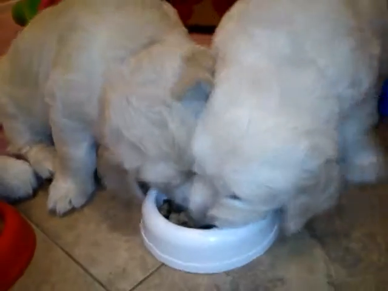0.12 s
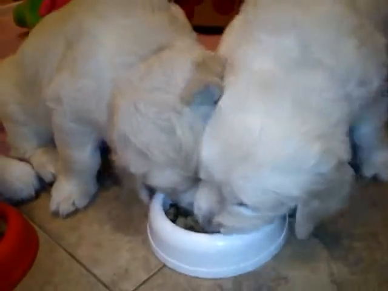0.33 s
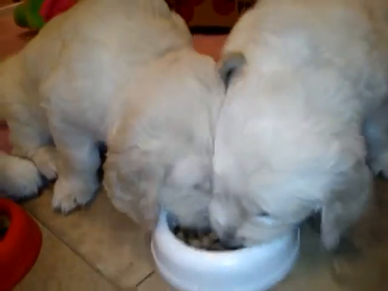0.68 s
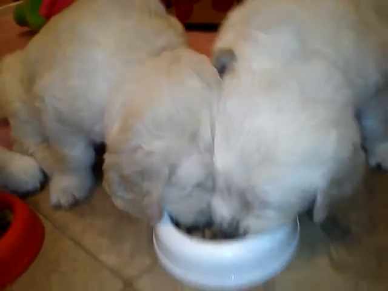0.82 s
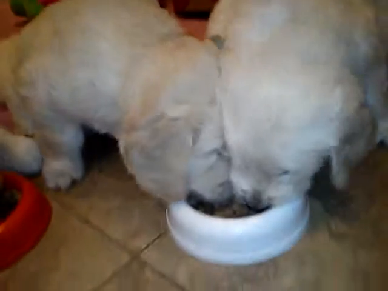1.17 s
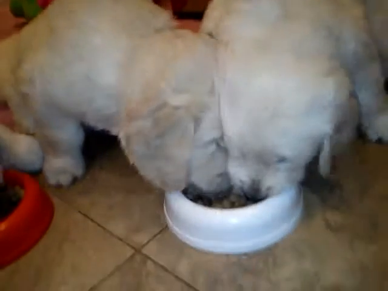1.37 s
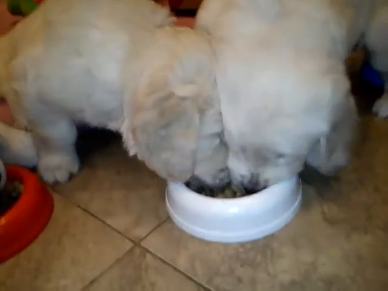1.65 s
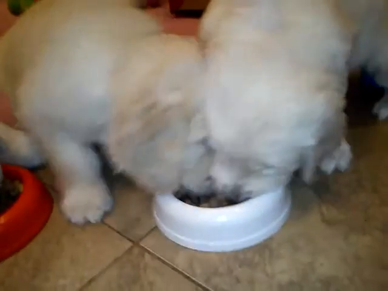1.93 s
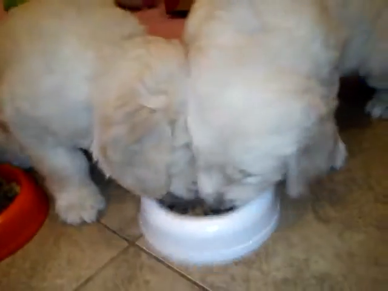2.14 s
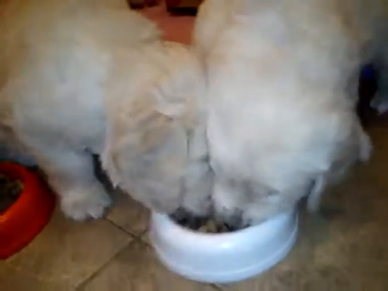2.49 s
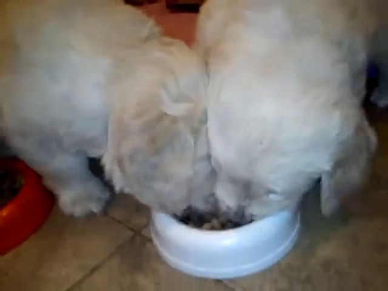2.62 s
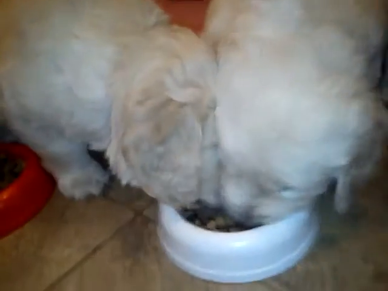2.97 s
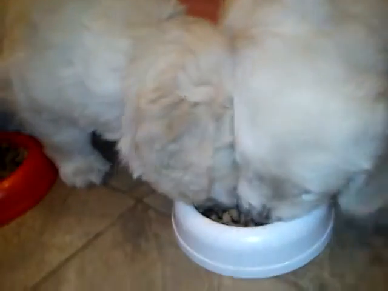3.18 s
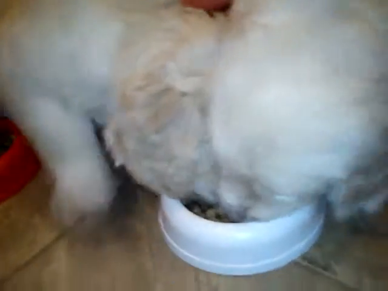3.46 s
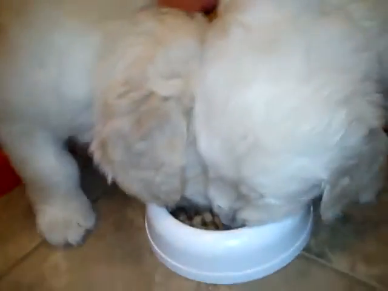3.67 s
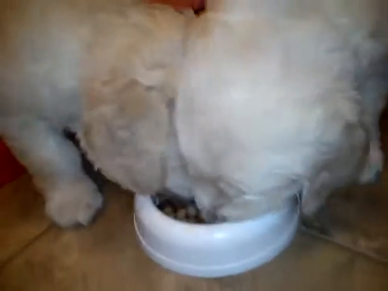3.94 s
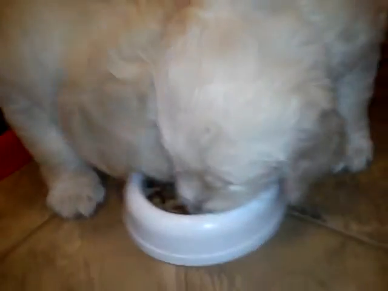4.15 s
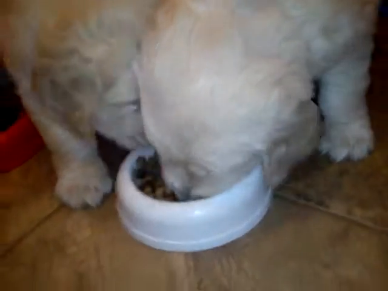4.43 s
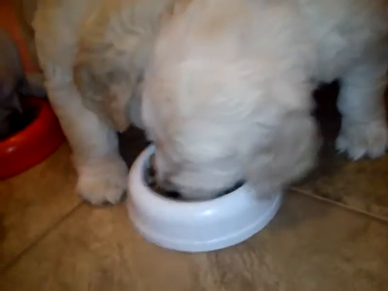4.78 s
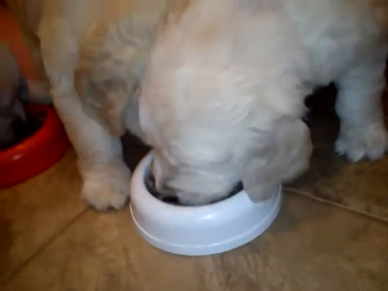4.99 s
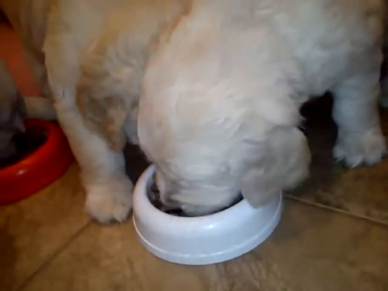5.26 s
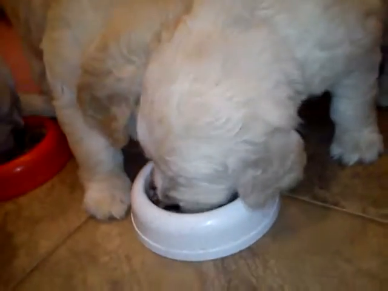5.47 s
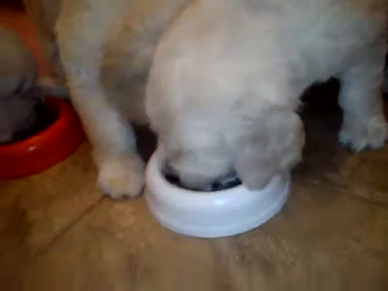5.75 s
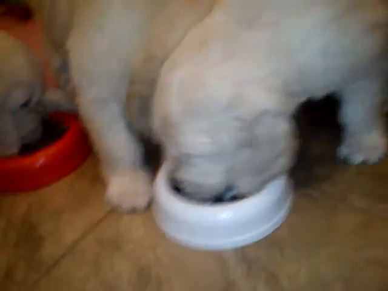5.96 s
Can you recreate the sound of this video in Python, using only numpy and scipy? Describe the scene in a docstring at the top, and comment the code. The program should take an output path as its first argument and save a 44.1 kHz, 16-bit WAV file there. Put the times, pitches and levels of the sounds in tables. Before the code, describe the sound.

Close mono sound of two puppies eating dry kibble from a plastic bowl on a hard floor, in a quiet room with short, slight reverberation. From the start, muzzle shoves make irregular bursts of dense pellet clatter, several per second, with crisp ticks, a hollow plastic colour and dull closed-mouth munching. A small pellet snaps at 0.15 s; bowl knocks begin around 0.55 s and recur unevenly. More snaps come at 1.2 to 1.6 s, and soft low paw thumps from 1.9 s. At 2.75 s a strong knock coincides with bright cracks. Rummaging grows fuller and loudest from 3.4 to 4 s, with several knocks; another hard, sharp one lands at 4.2 s. Afterwards the clatter thins and softens, with a duller knock at 5.2 s. From 5.3 s fur hisses faintly on the rim while light crunching continues to the end at about 6.1 s.

```python
"""Two puppies root for dry kibble in a plastic bowl on a hard floor, close to a mono microphone.
From the start, muzzle shoves set off dense random clicks, filtered and rung by bowl modes; dull clicks munch.
Pellets snap from 0.15 s (noise bursts); the bowl is knocked from 0.55 s (short pulses through filters).
Paws thump softly from 1.9 s (low noise pulses); fur, a very faint hiss until then, brushes the rim from 5.3 s.
Shaped noise gives the quiet of the room throughout."""
import sys
import numpy as np
from scipy import signal
from scipy.fft import rfft, irfft
from scipy.io import wavfile
from scipy.ndimage import uniform_filter1d

SR = 44100
rng = np.random.default_rng(int(sys.argv[2]) if len(sys.argv) > 2 else 0)


def dump(signal):
    """Clip the signal to [-1, 1] and save it as 16-bit WAV at the path in sys.argv[1]."""
    limited = np.clip(np.atleast_2d(signal).T, -1, 1)
    pcm = np.round(limited * 32767).astype(np.int16)
    wavfile.write(sys.argv[1], SR, pcm)


N = 269892
TIME_S = np.arange(N) / SR

# Muzzle shoves: (time [s], clatter rise [s], length [s], relative clatter level [dB],
# crispness: treble re clatter [dB], relative munching level [dB])
MUZZLE_SHOVES = [ (0.0, 0.0013, 0.049, -58, -8, -59.5), (0.047, 0.04, 0.13, -48, -6.5, -62),
                 (0.173, 0.026, 0.06, -45, -8.5, -60.5), (0.307, 0.013, 0.017, -52.5, -12.5, -59.5),
                 (0.357, 0.016, 0.044, -46.5, -8.5, -58.5), (0.403, 0.055, 0.17, -41.5, -7.5, -61),
                 (0.588, 0.016, 0.071, -45, -8, -72), (0.731, 0.073, 0.088, -50, -11, -65.5),
                 (0.904, 0.0049, 0.013, -52.5, -9.5, -72), (0.923, 0.082, 0.11, -42, -9, -63.5),
                 (1.031, 0.009, .03, -51, -2.5, -61), (1.108, 0.027, 0.048, -55, -8, -68),
                 (1.195, 0.038, 0.14, -49.5, -10.5, -61.5), (1.362, 0.018, 0.061, -49.5, -11, -64.5),
                 (1.487, .008, 0.012, -68, -17, -80), (1.626, 0.042, 0.078, -49.5, -9, -70),
                 (1.75, 0.049, 0.088, -43.5, -7, -65), (1.853, .025, .065, -50.5, -12, -64),
                 (1.963, 0.059, 0.13, -45, -10, -68.5), (2.06, 0.048, 0.19, -42.5, -7.5, -68),
                 (2.266, 0.039, 0.14, -47.5, -9, -65), (2.369, .07, .125, -45, -8.5, -75),
                 (2.522, 0.014, 0.03, -49.5, -10.5, -72), (2.622, 0.024, 0.06, -49.5, -10.5, -60),
                 (2.738, 0.0071, 0.082, -42.5, -4, -59), (2.837, 0.05, 0.15, -45, -5.5, -66),
                 (2.98, 0.02, 0.11, -42, -8.5, -60), (3.095, 0.054, 0.17, -43, -8, -62.5),
                 (3.245, 0.0082, 0.034, -46, -7.5, -60), (3.326, 0.043, 0.1, -48, -11.5, -60.5),
                 (3.441, .075, 0.15, -40.5, -8.5, -61.5), (3.591, 0.03, 0.057, -37, -10, -57),
                 (3.675, 0.011, 0.031, -49, -18, -56.5), (3.753, 0.011, 0.05, -40.5, -12, -58),
                 (3.793, 0.03, 0.13, -40.5, -8, -60), (3.978, .012, 0.032, -48.5, -11, -58),
                 (4.1, 0.025, 0.097, -42, -11.5, -66), (4.167, 0.034, 0.097, -43, -9.5, -63),
                 (4.326, 0.021, 0.074, -53.5, -10, -60.5), (4.466, 0.048, 0.09, -48, -12, -66.5),
                 (4.569, 0.012, 0.029, -51, -12.5, -79), (4.698, 0.029, 0.045, -50.5, -9, -60),
                 (4.744, 0.036, 0.064, -50, -9.5, -66), (4.853, .012, .028, -66, -20, -67),
                 (4.928, 0.019, 0.058, -56, -9, -65.5), (5.045, 0.027, 0.039, -54, -9.5, -63.5),
                 (5.206, 0.012, 0.034, -52.5, -9, -59.5), (5.33, .015, 0.018, -61.5, -4, -74),
                 (5.383, 0.011, 0.023, -61.5, -4, -70.5), (5.453, 0.023, 0.058, -60.5, -7, -83),
                 (5.508, 0.024, 0.042, -54, -10.5, -66), (5.702, 0.04, 0.12, -59.5, -5, -65),
                 (5.897, 0.039, 0.069, -54.5, -9, -65.5), (5.951, 0.02, 0.032, -52, -10, -58.5),
                 (6.008, 0.023, 0.085, -55.5, -7, -61.5), ]
# Muzzle depth, which brings out the bowl's hollow: (time [s], hollow re clatter [dB])
DIG_DEPTH = [(0, -2.5), (.5, -7), (1.3, 1.5), (1.7, -2.5), (2.15, -1.5), (2.5, -5), (2.75, -1.5), (2.9, -9),
             (3.15, -7), (3.35, -1), (3.65, -1), (3.9, -6), (4.2, -3), (4.55, -1.5), (4.8, -0.5), (6.1, 0)]
# Chewed crumbs grind finer than whole pellets: (time [s], lift of the top treble [dB])
CRUMB_FINENESS = [(0, 4), (.5, 2), (1, -0.5), (1.5, -1.5), (2.2, -3), (2.75, -2.5), (3.2, 1.5),
                  (3.45, -5.5), (4.2, -5.5), (4.7, -1.5), (6.1, -15)]
# Knocks on the bowl: (time [s], relative level [dB], contact time [ms])
BOWL_KNOCKS = [(.551, -46, 0.15), (.602, -35, 0.17), (.984, -36, 0.24), (1.239, -38, 0.22),
               (1.793, -44, 0.48), (2.134, -36.5, 0.95), (2.653, -36, 0.6), (2.7431, -27, 0.42),
               (3.469, -34, 0.49), (3.622, -33, 0.15), (3.762, -35, 0.41), (3.993, -51, 0.44),
               (4.104, -34, 0.17), (4.2043, -27, 0.13), (4.358, -37, 0.39), (4.522, -38.5, 0.15),
               (4.616, -41, 0.36), (5.236, -39, 0.71)]
# Pellets snapping between teeth: (time [s], relative level [dB])
TOOTH_SNAPS = [(0.146, -53), (.752, -56), (1.163, -59), (1.24, -50.5), (1.407, -49.5), (1.498, -60),
               (1.6155, -59.5), (2.751, -42.5), (2.785, -50), (4.434, -62), (4.618, -58), (5.047, -69),
               (5.77, -71), (5.963, -57)]
# Ringing of the bowl: (frequency [Hz], width [Hz], gain re direct sound [dB])
BOWL_MODES = [(695, 52, -11), (769, 26, -4.5), (2169, 83, 5), (3054, 120, 6), (4080, 94, -11),
              (6050, 59, -11), (7040, 21, 4), (7890, 380, -1)]
# Fur on the rim: (time [s], relative level [dB])
FUR_BRUSH = [(5.3, -75), (5.38, -62.5), (5.55, -67), (5.62, -69), (5.72, -63.5), (6.12, -65.5)]
# Paw steps and shifts of weight: (time [s], relative level [dB])
PAW_STEPS = [(1.94, -69), (2.744, -67), (3.179, -61.5), (3.258, -64), (4.439, -71), (4.561, -71),
             (5.845, -67)]
# Spectrum of pellet clatter: (frequency [Hz], relative density [dB])
CLATTER_SPECTRUM = [(120, -43), (400, -22.5), (700, -12), (1080, -13), (1300, 2.5), (1450, -3), (1640, 1),
                    (1900, -1.5), (2080, -10.5), (2260, -7), (2380, -13), (2750, -18.5), (3800, -59)]
# Spectrum of the bowl's hollow: (frequency [Hz], relative density [dB])
HOLLOW_SPECTRUM = [(80, -48), (250, -38.5), (500, -12.5), (660, 2.5), (810, 0.5), (1050, -4.5), (1500, -32)]
# Spectrum of dry crusts: (frequency [Hz], relative density [dB])
CRUST_SPECTRUM = [(200, -38), (1900, -27.5), (2900, -7.5), (3800, 4), (4700, -3.5), (5800, 0), (6700, -5),
                  (8300, -2.5), (9000, -5), (11400, -7.5), (12300, -15), (13500, -14.5), (16000, -19)]
# Spectrum of closed mouths, also the knocks' thud: (frequency [Hz], relative density [dB])
JAW_SPECTRUM = [(50, -41.5), (130, -13), (220, -12.5), (320, -5.5), (450, 1.5), (650, 3.5), (950, -2.5),
                (1500, 0), (3000, -80.5)]
# Spectrum of breaking pellets: (frequency [Hz], relative density [dB])
CRACK_SPECTRUM = [(500, -21), (2500, -26), (6000, 3), (9000, 7), (12000, 1), (16000, -8)]
# Spectrum of sliding fur: (frequency [Hz], relative density [dB])
FUR_SPECTRUM = [(800, 4), (2500, -6), (4200, 2), (6800, -3), (10000, 0), (11500, -1), (12300, -6),
                (16000, -12)]
# Spectrum of padded steps: (frequency [Hz], relative density [dB])
THUMP_SPECTRUM = [(25, 8), (70, 8.5), (110, 4.5), (200, -8), (600, -43)]
# Spectrum of the quiet room: (frequency [Hz], relative density [dB])
ROOM_SPECTRUM = [(20, -7), (90, -2), (220, -6), (700, -3), (1800, -5), (3000, -12), (8000, -19.5),
                 (16000, -34)]

# After a shove each part dies away at its own speed; faint stirring remains between shoves.
SETTLE_DB_PER_S, CRUST_SETTLE_DB_PER_S, JAW_SETTLE_DB_PER_S = 252, 223, 214
IDLE_DB, CRUST_IDLE_DB, JAW_IDLE_DB = -78.5, -87.5, -89
SWELL_DB, CRUST_SWELL_DB, JAW_SWELL_DB = 0.6, 0.5, 0.5  # shoves and bites press hardest in the middle
CRUST_RISE_RATIO, JAW_RISE_RATIO = 1.1, 0.5  # re clatter: crusts build later, jaws bite sooner
EDGE_HZ = 15750


def pellets(clatter_db=0.6, hollow_db=-2.5, crisp_db=0.62, shared=0.29, full_db=-42.5,
            crowding=0.45, top_hz=9500):
    """Tumbling pellets clatter, sound the hollow of the bowl, and tick and scrape with dry crusts."""
    *_, shoves_db, crispness_db, _ = np.transpose(MUZZLE_SHOVES)
    level_db = shoving(shoves_db, SWELL_DB, SETTLE_DB_PER_S, IDLE_DB)
    crust_db = shoving(shoves_db + crispness_db, CRUST_SWELL_DB, CRUST_SETTLE_DB_PER_S,
                       CRUST_IDLE_DB, CRUST_RISE_RATIO)

    crowd = amp(crowding * (level_db - full_db))  # a harder shove moves more pellets
    tumbles = contacts(per_s=2400 * crowd, spread_db=0.5)
    scrapes = contacts(per_s=4000 * crowd, spread_db=2.5)

    crust_clicks = np.sqrt(shared) * tumbles + np.sqrt(1 - shared) * scrapes
    crust = facets(crust_clicks, fade_s=0.00029)
    highpass = signal.butter(2, top_hz, "high", fs=SR, output="sos")
    top = signal.sosfiltfilt(highpass, crust)
    crust = crust + (amp(curve(CRUMB_FINENESS)) - 1) * top

    depth_rad = np.arctan(amp(curve(DIG_DEPTH)))  # divides energy between clatter and hollow
    clatter = facets(tumbles, fade_s=0.00069) * amp(level_db + clatter_db) * np.cos(depth_rad)
    hollow = facets(tumbles, fade_s=0.0013) * amp(level_db + hollow_db) * np.sin(depth_rad)
    crisp = crust * amp(crust_db + crisp_db)
    return (colour(clatter, CLATTER_SPECTRUM) + colour(hollow, HOLLOW_SPECTRUM)
            + colour(crisp, CRUST_SPECTRUM))


def knocks(ring_db=4.5, hollow_db=0.0, thud_db=-2.0):
    """Short pushes on the bowl; a longer contact gives a duller knock."""
    pushes = np.zeros(N)
    t_ms = np.arange(SR // 100) * 1000 / SR
    for start_s, level_db, contact_ms in BOWL_KNOCKS:
        push = np.exp(-(2 * t_ms / contact_ms - 2) ** 2)
        add(pushes, start_s, amp(level_db) * push / np.sqrt(np.sum(push ** 2)))
    ring = amp(ring_db) * colour(pushes, CLATTER_SPECTRUM)
    hollow = amp(hollow_db) * colour(pushes, HOLLOW_SPECTRUM)
    thud = amp(thud_db) * colour(pushes, JAW_SPECTRUM)
    return ring + hollow + thud


def jaws(level_db=5.5):
    """Crunches inside closed mouths come out dull."""
    *_, munches_db = np.transpose(MUZZLE_SHOVES)
    munch_db = shoving(munches_db, JAW_SWELL_DB, JAW_SETTLE_DB_PER_S, JAW_IDLE_DB, JAW_RISE_RATIO)
    crunches = contacts(per_s=380, spread_db=2.5) * amp(munch_db + level_db)
    return colour(crunches, JAW_SPECTRUM)


def snaps(fade_s=0.0065):
    """A pellet breaks in a quick run of tiny cracks: a decaying burst of spiky noise."""
    cracks = np.zeros(N)
    t_s = np.arange(SR // 20) / SR
    for start_s, level_db in TOOTH_SNAPS:
        burst = unit(rng.laplace(size=len(t_s)))
        add(cracks, start_s, amp(level_db) * np.exp(-t_s / fade_s) * burst)
    return colour(cracks, CRACK_SPECTRUM)


def bowl(x):
    """Whatever strikes the plastic also rings its modes."""
    return x + sum(amp(db) * resonance(x, hz, width_hz) for hz, width_hz, db in BOWL_MODES)


def fur():
    """Countless hairs slide over the rim as a soft hiss."""
    return colour(rng.standard_normal(N) * amp(curve(FUR_BRUSH)), FUR_SPECTRUM)


def paws(rise_s=0.015):
    """Padded feet give the floor a soft low thump."""
    pushes = np.zeros(N)
    t_s = np.arange(SR // 4) / SR
    press = t_s / rise_s * np.exp(1 - t_s / rise_s)
    for start_s, level_db in PAW_STEPS:
        add(pushes, start_s, amp(level_db) * press * rng.standard_normal(len(t_s)))
    return colour(pushes, THUMP_SPECTRUM)


def room_tone(level_db=-65.5):
    """Steady noise in the spectrum of the quiet room."""
    return amp(level_db) * colour(rng.standard_normal(N), ROOM_SPECTRUM)


def surroundings(x, near_db, room_db, count=6, paths_per_s=11):
    """Bowl wall, floor and room reflect sound by a cycle of crossfaded paths as the heads move."""
    phase = TIME_S * paths_per_s % count
    wet = x
    for path in range(count):
        distance = abs((phase - path + count / 2) % count - count / 2)
        part = x * np.cos(np.pi / 2 * np.minimum(distance, 1))
        wet = wet + amp(near_db) * echoes(part, t60_s=0.02, delay_s=0.0012, per_s=5000)
        wet = wet + amp(room_db) * echoes(part, t60_s=0.54, delay_s=0.0037, per_s=4800)
    return wet / np.sqrt(1 + amp(near_db) ** 2 + amp(room_db) ** 2)


def echoes(x, t60_s, delay_s, per_s):
    """Sparse reflections of random sign that die away, with unit energy."""
    t_s = np.arange(SR // 2) / SR
    signs = rng.choice([-1., 1.], len(t_s))
    present = (rng.random(len(t_s)) < per_s / SR) * (t_s > delay_s)
    taps = signs * present * amp(-60 * t_s / t60_s)
    return signal.oaconvolve(x, taps / (np.linalg.norm(taps) + 1e-12))[:N]


def shoving(levels_db, swell_db, settle_db_per_s, idle_db, rise_ratio=1):
    """Level in dB of all shoves: each rises, swells and eases over its length, then settles."""
    power = np.full(N, amp(idle_db) ** 2)
    t_s = np.arange(SR // 2) / SR
    for (start_s, rise_s, length_s, *_), level_db in zip(MUZZLE_SHOVES, levels_db):
        attack = np.minimum(t_s / (rise_s * rise_ratio), 1)
        arch_db = swell_db * (np.sin(np.pi * np.minimum(t_s / length_s, 1)) - 0.5)
        fall_db = settle_db_per_s * np.maximum(t_s - length_s, 0)
        add(power, start_s, (attack * amp(level_db + arch_db - fall_db)) ** 2)
    return 10 * np.log10(power)


def contacts(per_s, spread_db, size=1100):
    """Random clicks of uneven strength that share a steady supply of energy."""
    strength = amp(spread_db * np.minimum(rng.exponential(1, N), 4)) * rng.choice([-1., 1.], N)
    clicks = strength * (rng.random(N) < per_s / SR)
    power = uniform_filter1d(uniform_filter1d(clicks ** 2, size), size)
    return unit(clicks / np.sqrt(abs(power) + 0.053 * power.mean()))


def facets(clicks, fade_s, count=16):
    """Pellets differ: each contact gets one of several tiny random rattles."""
    t_s = np.arange(SR // 200) / SR
    kind = rng.integers(0, count, N)
    rattles = rng.standard_normal((count, len(t_s))) * np.exp(-t_s / fade_s)
    spectra = rfft(rattles)
    rattles = irfft(spectra / np.sqrt(np.mean(abs(spectra) ** 2, axis=0)))  # together they are white
    parts = (signal.oaconvolve(clicks * (kind == k), rattle)[:N] for k, rattle in enumerate(rattles))
    return unit(sum(parts))


def colour(x, spectrum, size=4096):
    """Causal minimum-phase filter of unit energy with the given spectrum."""
    hz, db = np.transpose(spectrum)
    log_hz = np.log(abs(np.fft.fftfreq(size, 1 / SR)) + 1)
    log_gain = np.log(amp(np.interp(log_hz, np.log(hz), db)))
    taps = np.fft.ifft(np.exp(np.conj(signal.hilbert(log_gain)))).real[:size // 2]
    return signal.oaconvolve(x, taps / np.linalg.norm(taps))[:N]


def resonance(x, hz, width_hz):
    """Band-pass of gain 1 at its centre."""
    return signal.lfilter(*signal.iirpeak(hz, hz / width_hz, SR), x)


def curve(rows):
    """Second column of a table, joined by straight lines in time."""
    times_s, values = np.transpose(rows)
    return np.interp(TIME_S, times_s, values)


def add(mix, start_s, sound):
    """Adds a sound in place, cut at the end of the mix."""
    part = mix[round(start_s * SR):][:len(sound)]
    part += sound[:len(part)]


def amp(db):
    """Amplitude ratio of a level in dB."""
    return 10 ** (np.asarray(db) / 20)


def unit(x):
    """Scales to rms 1."""
    return x / np.sqrt(np.mean(x ** 2) + 1e-20)


def scene():
    """The meal over the quiet of the room, the same in both channels."""
    eating = surroundings(bowl(pellets() + snaps()) + jaws() + fur(), near_db=-5.5, room_db=-7.5)
    # the outer wall faces the microphone
    knocking = surroundings(bowl(knocks()), near_db=-5.0, room_db=-17.0)
    mono = eating + knocking + paws() + room_tone()
    return np.array([mono, mono])


def record(dry, offset=0.001):
    """The recorder sits slightly off zero and limits the band."""
    lowpass = signal.firwin(801, EDGE_HZ, window=("kaiser", 8), fs=SR)
    return signal.oaconvolve(dry + offset, lowpass[None], "same")


dry = scene()
out = record(dry)
dump(out)
```